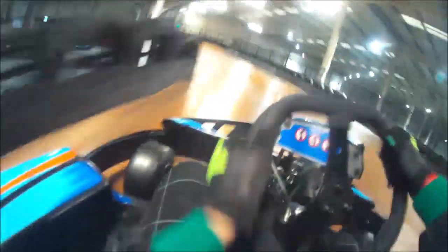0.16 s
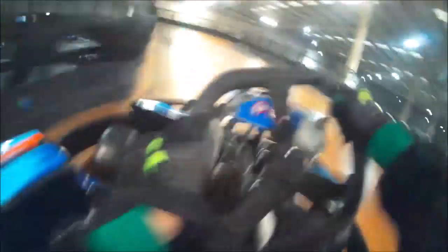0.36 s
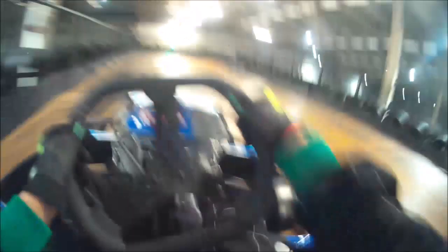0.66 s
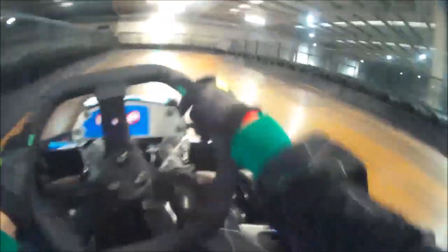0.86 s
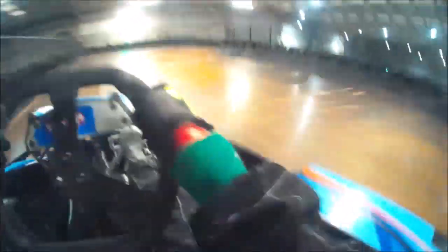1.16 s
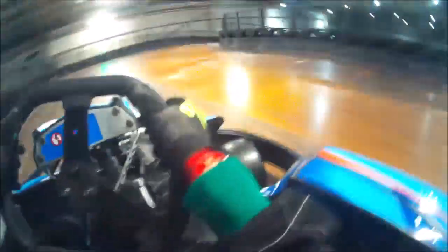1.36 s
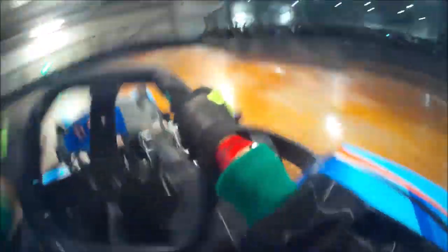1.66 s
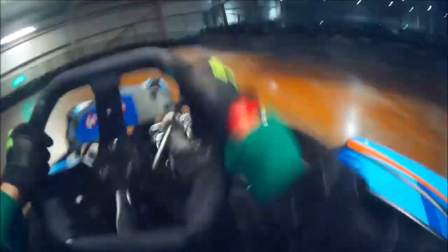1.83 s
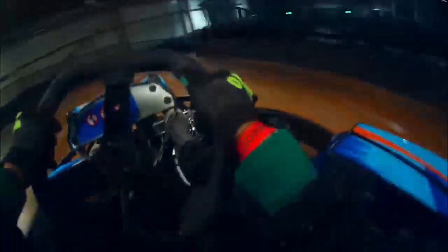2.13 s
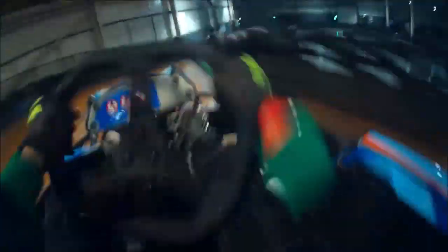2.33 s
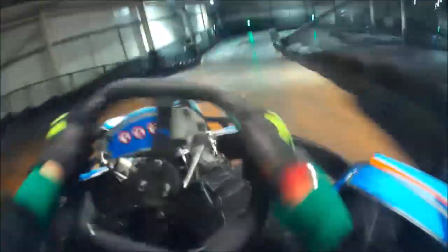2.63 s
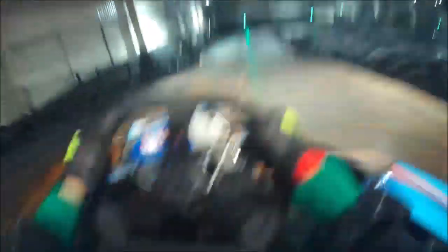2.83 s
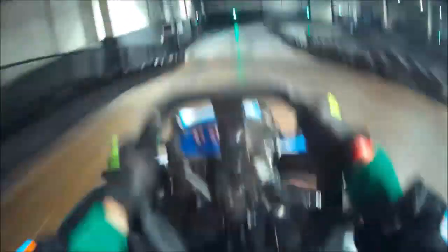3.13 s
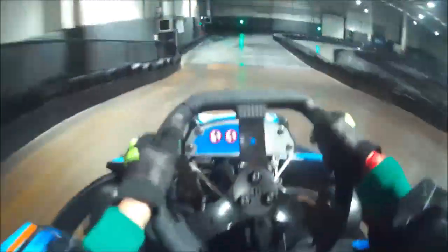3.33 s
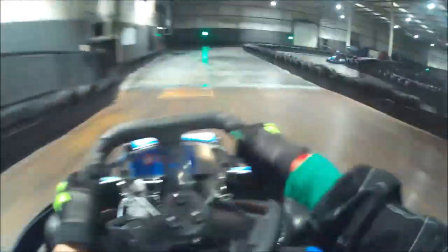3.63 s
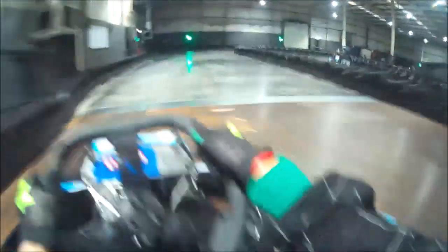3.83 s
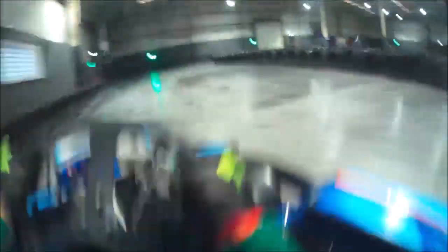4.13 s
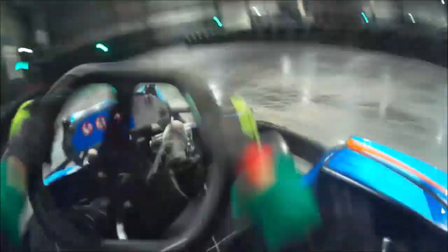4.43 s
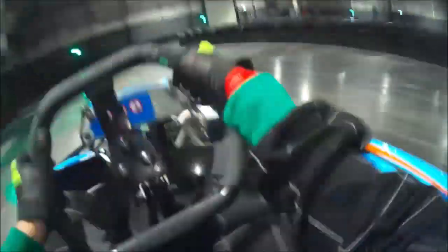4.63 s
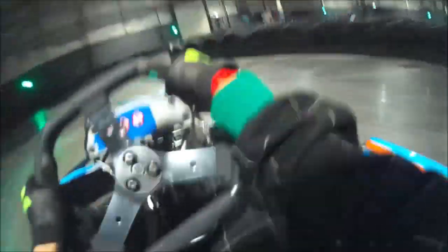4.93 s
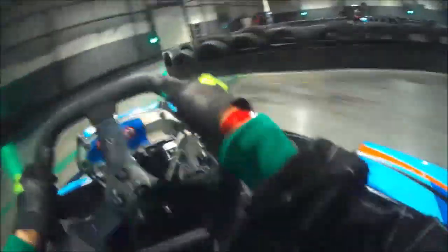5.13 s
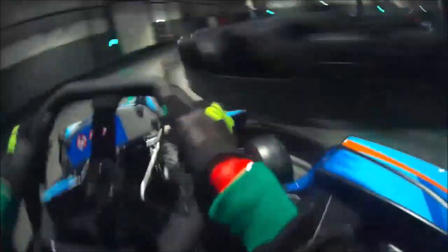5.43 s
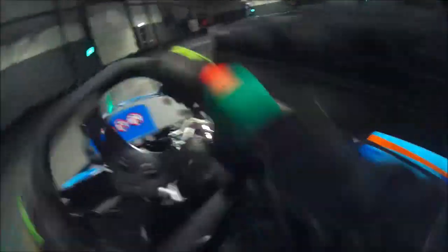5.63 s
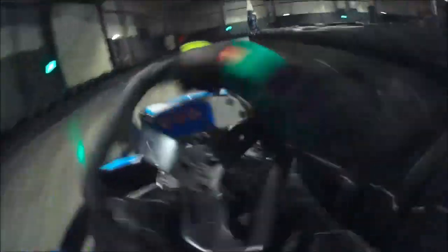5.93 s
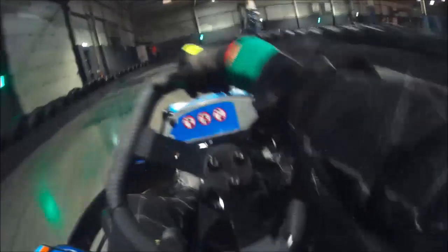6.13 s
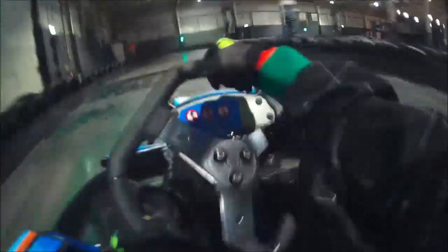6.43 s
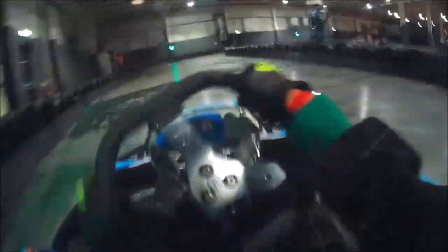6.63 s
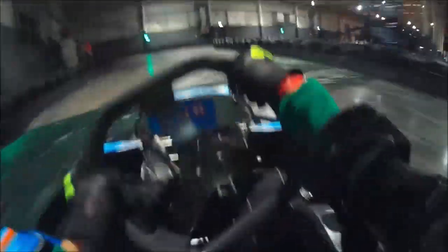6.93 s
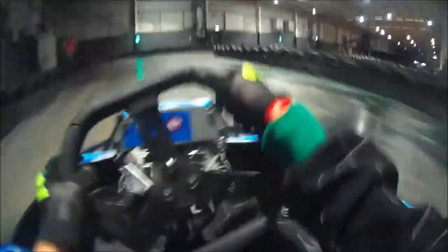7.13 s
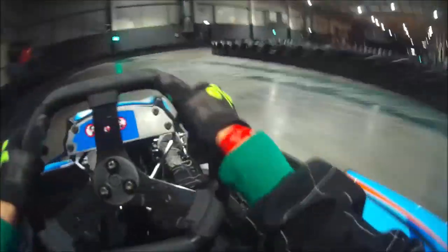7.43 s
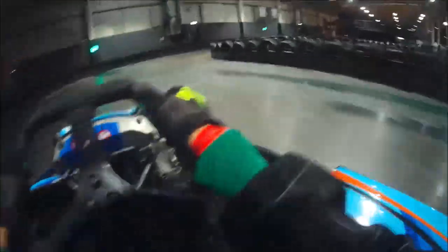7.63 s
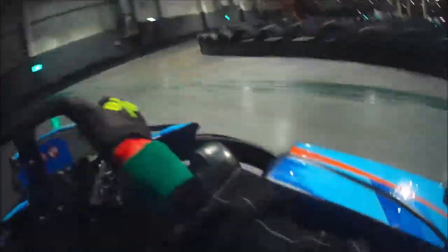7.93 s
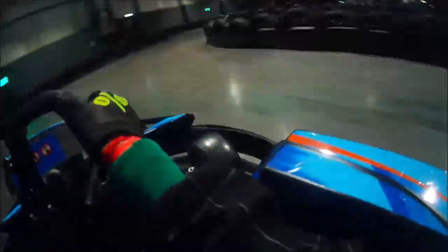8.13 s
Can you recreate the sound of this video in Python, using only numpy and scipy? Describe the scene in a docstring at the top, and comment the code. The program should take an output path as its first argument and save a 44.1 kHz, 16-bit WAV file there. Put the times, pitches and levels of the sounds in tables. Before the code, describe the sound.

Worn by the driver of an electric kart in a large indoor hall, the microphone picks up muffled rolling roar and hollow case drumming. Sliding tyres give thin, high chirps, then a bump knocks plastic parts sharply. After it come a few squeaks, a rapid cluster of rough lower screeches and a loud closing squeal. Motor whine and hum stay faint.

```python
"""Wheels roar and drum through a camera case worn by the driver of an electric go-kart on polished concrete in a
large hall. Sliding tyres chirp high and screech lower as they bite harder: tones with a pitch that load drags down.
Half-way the kart jolts over a bump and its plastic parts knock, as decaying case modes. Rolling and skidding are
coloured, fluttering noise; a faint drive whine and hum are sines. The tyre cries alone carry a diffuse hall tail."""
import sys
import numpy as np
from scipy import signal
from scipy.fft import rfft, irfft, next_fast_len
from scipy.io import wavfile
from scipy.ndimage import uniform_filter1d, minimum_filter1d

SR = 44100
rng = np.random.default_rng(int(sys.argv[2]) if len(sys.argv) > 2 else 0)


def write(x):
    x = np.atleast_2d(x).T
    wavfile.write(sys.argv[1], SR, np.round(np.clip(x, -1, 1) * 32767).astype(np.int16))

N = 364548
TIME = np.arange(N) / SR

# motor speed, as the pitch of its whine: (time [s], pitch [Hz])
SPEED = [(0, 919), (.8, 905), (1.15, 946), (1.45, 1034), (1.9, 1042), (3.2, 1131), (3.8, 1232), (4.8, 1150),
         (6, 1120), (7, 945), (7.3, 937), (7.68, 1033), (7.76, 922), (8.27, 852)]
CRUISE_HZ = 1000  # whine pitch at cruising speed
# rolling levels at cruising speed [dB]; scrub, sizzle and hiss do not grow with speed
ROAD_DB, CASE_DB, SHAKE_DB = -51, -46.5, -58
ROLL_SCRUB_DB, ROLL_SIZZLE_DB, ROLL_HISS_DB = -46.5, -55, -59
ROAR_DB_PER_OCTAVE = 12  # growth of road, case and shake with speed
# sideways slides; roar and drumming as at cruising speed:
# (start [s], attack [s], end [s], release [s], road roar [dB], drumming [dB], hiss [dB])
SKIDS = [(.08, .14, .79, .09, -50, -40.5, -47.5), (1.285, .05, 4.56, .25, -49, -38, -53),
         (5.15, .17, 5.335, .09, -47, -39, -51), (5.41, .12, 7.24, .15, -47, -37, -48),
         (7.9, .3, 8.3, .1, -58, -50, -50)]
# scrub in a full skid: (time [s], level [dB])
SCRUB_LEVEL = [(.4, -36.5), (1.4, -38), (3, -33.5), (4.5, -40.5), (5.8, -47), (6.9, -29.5), (7.3, -38),
               (8.27, -34)]
# sizzle in a full skid: (time [s], level [dB])
SIZZLE_LEVEL = [(.2, -40.5), (1.4, -43), (2.9, -35.5), (3.3, -41.5), (4, -47), (4.5, -40), (5.3, -46),
                (5.6, -41.5), (6.5, -46.5), (6.8, -36.5), (7.15, -49), (8.27, -45)]
# chassis shaking around the bump: moment, half-width and peak level
BUMP_S, BUMP_WIDTH_S, BUMP_SHAKE_DB = 4.27, .15, -49

# noise colours, relative levels: (frequency [Hz], density [dB per Hz])
ROAD = [(60, -29), (110, -5.5), (190, 0), (280, -3), (400, 2), (620, -1), (800, -1), (1050, -0.5),
        (1500, -33), (3000, -58)]
DRUMMING = [(800, -24), (1090, -10.5), (1230, 2.5), (1350, 0.5), (1450, 1.5), (1580, -3.5), (1800, -7.5),
            (2200, -11), (2550, -17.5), (3000, -14), (3600, -24), (5000, -23)]
TREAD = [(1300, -40), (1650, -9), (1900, -4.5), (2120, 3.5), (2350, -3), (2560, -9.5), (2950, -16.5),
         (3400, -20.5), (5000, -46)]
SIZZLE = [(2400, -10), (3000, -0.5), (3700, -4), (4300, 6), (4650, -3), (4900, -2.5), (5060, 2.5),
          (5350, -41), (7000, -21.5), (8300, -30), (9200, -18.5), (10000, -61)]
HISS = [(2500, -9), (4000, 2), (5600, 7), (6600, -3), (7600, -9.5), (9100, -9.5), (10000, -14.5),
        (11400, -13), (13000, -20), (16000, -22)]
RUMBLE = [(10, -2), (25, -3.5), (36, -6), (50, -9.5), (70, -12.5), (130, -25)]
# grit under a jolted wheel: (frequency [Hz], density [dB per Hz])
GRIT = [(2500, -6), (4000, -2), (6000, 5), (8800, -6), (10000, -8), (11500, -13), (13000, -22),
        (16000, -32)]

# hard slides: (start [s], length [s], lowest nominal pitch [Hz], level at deepest bite [dB], roughness [0-1])
SCREECHES = [(.459, 0.023, 2020, -22.5, .75), (.564, 0.058, 2070, -31.5, .7), (4.384, .047, 2043, -27, 0.3),
             (5.877, .018, 2060, -20.5, .3), (6.016, .03, 1967, -19.5, 0.6), (6.127, 0.015, 1927, -24, .85),
             (6.241, 0.054, 1990, -26.5, 0.81), (6.359, 0.04, 2015, -15.5, .42),
             (6.392, .027, 1792, -17.5, 0.54), (6.477, 0.044, 1931, -20.5, 0.5),
             (6.603, .017, 1744, -21, .85), (6.641, 0.023, 2004, -15.5, 0.07),
             (6.681, 0.061, 1720, -24.5, 0.61), (6.717, 0.073, 2000, -17.5, .35),
             (6.872, 0.036, 1792, -23, .55), (6.953, .068, 2030, -24.5, .3), (7.2, 0.042, 1250, -29, .06),
             (7.915, 0.015, 1840, -27.5, .4), (7.947, .027, 1780, -28, 0.2), (8.18, .065, 1210, -21, .3)]
SCREECH_BEND = .079  # share by which the pitch lies higher with no load
SCREECH_BITE = .44  # moment of the deepest bite, as a share of the length
# tyres in a full slide: (start [s], length [s], mean pitch [Hz], swing [Hz], wheel speed [turns per s],
# first low point [s], level half-way [dB], swell at the low point [dB])
SQUEALS = [(7.972, 0.33, 1780, 165, 9.5, 8.0, -17, 4), (7.97, 0.29, 2010, 185, 8.9, 8.024, -15.5, -1)]
SQUEAL_ATTACK_S, SQUEAL_GROWTH_DB_PER_S, SQUEAL_ROUGH = .0071, 18, .12
SQUEAL_LURCH, SQUEAL_LURCHES_PER_S = .028, 30  # rms share by which the pitch strays, and how often
# screech overtones as the case passes them: (frequency [Hz], level re fundamental [dB])
SCREECH_OVERTONES = [(3200, -29), (3700, -23), (4000, -32.5), (5000, -52), (5500, -24.5), (6100, -39),
                     (7000, -62), (9200, -50), (11000, -67)]

# light slides: (start [s], length [s], lowest nominal pitch [Hz], level before CHIRP_TRIM_DB [dB],
# moment of the deepest bite [share of length])
CHIRPS = [(.178, 0.081, 3950, -28, 0.77), (0.326, .026, 3980, -23.5, 0.57), (0.342, 0.093, 4450, -30, 0.2),
          (.49, .08, 4300, -36, .5), (1.299, 0.085, 3990, -33, .4), (1.388, 0.12, 4110, -31, .3),
          (1.508, .07, 4010, -33.5, .5), (1.524, .035, 2880, -34, 0.45), (1.644, .055, 3980, -28.5, 0.28),
          (1.814, 0.084, 4200, -33, 0.45), (1.942, 0.038, 4120, -30.5, .3), (2.003, 0.2, 4130, -30, 0.8),
          (2.379, .07, 3850, -33.5, 0.38), (2.498, .11, 4010, -28.5, .5), (2.656, .018, 3900, -27.5, 0.54),
          (2.675, .06, 3100, -28.5, .6), (2.715, .028, 3945, -26, 0.21), (2.814, .12, 3180, -33, 0.45),
          (2.827, 0.16, 4036, -29.5, .4), (4.206, 0.037, 3890, -26, 0.67), (4.392, 0.0346, 3380, -24, 0.61),
          (4.418, .07, 4070, -29, 0.25), (4.612, .028, 5110, -37.5, 0.76), (4.79, .1, 4350, -42, .5),
          (5.458, .032, 4500, -34, .25), (5.532, .055, 4470, -32.5, .25), (5.85, .035, 4750, -37, .7),
          (6.436, 0.052, 4460, -36.5, 0.35), (6.534, 0.086, 4100, -35, 0.82),
          (6.663, .066, 3890, -28, 0.58), (6.664, .05, 2990, -30.5, .5)]
CHIRP_TRIM_DB = -1.5
CHIRP_BEND = .11  # share by which the pitch lies higher with no load
# chirp overtones as the case passes them: (frequency [Hz], level re fundamental [dB])
CHIRP_OVERTONES = [(6000, -22), (7500, -16), (8400, -23.5), (9300, -19), (10000, -42), (11500, -23),
                   (13000, -62), (16000, -52)]

# plastic on plastic: (time [s], peak level [dB], hardness as upper band edge [Hz])
KNOCKS = [(4.027, -24, 1500), (4.0403, -7, 2200), (4.0421, -16.5, 1600), (4.0715, -7.5, 3000),
          (4.129, -14, 2000), (4.145, -18, 2000), (4.192, -17, 2500), (4.232, -0.5, 7160),
          (4.2547, -2.5, 7200), (4.279, -12, 5020), (4.3545, -19, 10000), (4.52, -16, 2700)]
# modes of the camera case: (frequency [Hz], width [Hz], mean strength per Hz of width [dB])
CASE = [(1260, 190, 1), (1510, 130, -19), (1720, 410, 6), (2080, 230, 5.5), (2840, 150, 8.5),
        (4430, 1200, 1.5), (5600, 1700, -7), (8600, 1800, -28), (11300, 1500, -27)]
# loose parts rattle after the bump, spread 3 dB either side of the level
RATTLE_FROM_S, RATTLE_TO_S, RATTLE_DB, RATTLE_HZ = 4.04, 4.2, -20, 2000

# mean motor hum: (time [s], level [dB])
HUM = [(0, -76), (2.35, -58), (3.2, -77), (5, -56.5), (5.6, -64), (6.9, -56.5), (7.3, -70)]
WHINE_DB, WHINE_DB_PER_OCTAVE = -54, 15  # level at steady cruising speed, growth with speed
THROTTLE_DB = 2.2  # at most this much louder under power, and softer when coasting
CUTOFF_HZ = 15500


def wheels():
    """Rolling roars and drums on the case, louder with speed; skidding rubber adds scrub, sizzle and hiss."""
    sliding, skid_roar, skid_drumming, skid_hiss = skids()
    pace = from_db(ROAR_DB_PER_OCTAVE * speed_octaves())
    scrub_db, sizzle_db = in_time(SCRUB_LEVEL)[0], in_time(SIZZLE_LEVEL)[0]
    # hypot adds the powers of rolling and skidding
    road_level = pace * np.hypot(from_db(ROAD_DB), skid_roar)
    case_level = pace * np.hypot(from_db(CASE_DB), skid_drumming)
    scrub_level = np.hypot(from_db(ROLL_SCRUB_DB), sliding * from_db(scrub_db))
    sizzle_level = np.hypot(from_db(ROLL_SIZZLE_DB), sliding * from_db(sizzle_db))
    hiss_level = np.hypot(from_db(ROLL_HISS_DB), skid_hiss)
    bump = from_db(BUMP_SHAKE_DB) / (1 + ((TIME - BUMP_S) / BUMP_WIDTH_S) ** 2)
    shake_level = np.hypot(pace * from_db(SHAKE_DB), bump)

    road = road_level * noise(ROAD, flutter_db=1.3, flutter_rate=46)
    case = case_level * noise(DRUMMING, flutter_db=1.5, flutter_rate=30)
    scrub = scrub_level * noise(TREAD, flutter_db=2.0, flutter_rate=26)
    sizzle = sizzle_level * noise(SIZZLE, flutter_db=2.5, flutter_rate=33)
    hiss = hiss_level * noise(HISS, flutter_db=3.5, flutter_rate=18)
    shake = shake_level * noise(RUMBLE, flutter_db=2.5, flutter_rate=5.6)
    return road + case + scrub + sizzle + hiss + shake


def skids():
    """Each skid sets in, holds and lets go: slide (0-1), then the gains of roar, drumming and hiss."""
    start, attack, end, release, *levels_db = np.transpose(SKIDS)[:, :, None]
    rise = (TIME - start) / attack
    fall = 1 - (TIME - end) / release
    gates = np.clip(np.minimum(rise, fall), 0, 1)
    return [gates.sum(axis=0)] + [np.sum(from_db(db) * gates, axis=0) for db in levels_db]


def screeches():
    """Loaded tyres shudder low: hoarse while they skip, nearly pure in a full slide, swinging with the wheel."""
    wander, grip_db, out = 0.12 * drift(320), 5.9 * drift(143), np.zeros(N)

    def shudder(i, hz, rough):
        """Roughness shakes both pitch and grip."""
        shaken_hz = hz * (1 + rough * wander[i])
        grip = from_db(np.sqrt(abs(rough)) * grip_db[i])
        return stick_slip(shaken_hz, grip, SCREECH_OVERTONES)

    for start, length, low_hz, db, rough in SCREECHES:
        i = samples(start, length)
        pressed = load(i, SCREECH_BITE)
        hz = low_hz * (1 + SCREECH_BEND * (1 - pressed))
        add(out, start, from_db(db) * pressed ** .42 * shudder(i, hz, rough))
    for start, length, hz, swing_hz, turns_per_s, low_s, db, swell_db in SQUEALS:
        i = samples(start, length)
        age = TIME[i] - start
        turn = np.cos(2 * np.pi * turns_per_s * (TIME[i] - low_s))
        growth_db = SQUEAL_GROWTH_DB_PER_S * (age - length / 2)
        attack = np.minimum(age / SQUEAL_ATTACK_S, 1)
        level = from_db(db + swell_db * turn + growth_db) * attack
        lurch = 1 + SQUEAL_LURCH * drift(SQUEAL_LURCHES_PER_S)[i]
        add(out, start, level * shudder(i, (hz - swing_hz * turn) * lurch, SQUEAL_ROUGH))
    # torn rubber rasps along with the tone
    drumming = from_db(-20) * noise(DRUMMING, flutter_db=3.5, flutter_rate=70)
    hiss = from_db(-35) * noise(HISS, flutter_db=3.0, flutter_rate=90)
    return out + force_of(out) * (drumming + hiss)


def chirps():
    """Light tread edges squeak high; load drags the pitch down, and lower squeaks slip more raggedly."""
    wander, grip, out = .026 * drift(276), from_db(4.65 * drift(136)), np.zeros(N)
    for start, length, low_hz, db, bite in CHIRPS:
        i = samples(start, length)
        pressed = load(i, bite)
        ragged = (4400 / low_hz) ** 1.55
        hz = low_hz * (1 + CHIRP_BEND * (1 - pressed)) * (1 + ragged * wander[i])
        level = from_db(db + CHIRP_TRIM_DB) * pressed ** 0.37
        add(out, start, level * stick_slip(hz, grip[i], CHIRP_OVERTONES))
    sizzle = from_db(-15.5) * noise(SIZZLE, flutter_db=4.0, flutter_rate=180)
    hiss = from_db(-19.5) * noise(HISS, flutter_db=5.0, flutter_rate=89)
    return out + force_of(out) * (sizzle + hiss)


def stick_slip(hz, flutter, overtones):
    """Tread sticks and slips at a given pitch; overtones come and go with the firmness of the grip."""
    phase = 2 * np.pi * np.cumsum(hz) / SR
    orders = np.arange(2, 6)[:, None]
    heights = from_db(np.interp(orders * hz, *np.transpose(overtones), right=-99))
    upper = np.sum(heights * np.sin(orders * phase), axis=0)
    tone = np.sin(phase) + rms_one(np.sqrt(flutter)) * upper
    return np.sqrt(2) * tone * rms_one(flutter)


def load(i, bite):
    """The load on the tread rises from 0 to 1 at the deepest bite and falls again."""
    age = np.linspace(0, 1, len(i))
    ramp = np.interp(age, [0, np.clip(bite, .05, .95), 1], [0, 1, 0])
    return np.sin(np.pi / 2 * ramp)


def force_of(x):
    """The force behind a tone, as its short-term rms."""
    return np.sqrt(np.abs(uniform_filter1d(x ** 2, size=400)))


def knocks():
    """Short contacts ring the case, harder ones up to its higher modes; loose parts buzz and grit crunches."""
    out, jolt, t = np.zeros(N), np.zeros(N), np.arange(SR // 10) / SR
    hz, width, mode_db = np.transpose(CASE)[:, :, None]
    for s, db, hard_hz in KNOCKS + rattle(count=8):
        # each contact excites the modes a little differently
        strength = from_db(mode_db + 2.0 * rng.standard_normal(hz.shape)) * width
        modes = np.sin(2 * np.pi * (hz * t + rng.random(hz.shape)))
        ring = np.sum(strength * np.exp(-np.pi * width * t) * modes, axis=0)
        band = signal.butter(2, [400, min(hard_hz, SR / 4)], "band", fs=SR, output="sos")
        ring = signal.sosfilt(band, ring)
        add(out, s, from_db(db) * ring / np.abs(ring).max())
        # soft, heavy contacts shake the most
        softness = 1 / (1 + (hard_hz / 3000) ** 2)
        add(jolt, s, from_db(db) * softness * np.exp(-t / 0.02))
    buzz = from_db(-10.0) * noise(DRUMMING, flutter_db=1.5, flutter_rate=120)
    thud = from_db(-21) * noise(ROAD, flutter_db=0.0, flutter_rate=120)
    crunch = from_db(-24.5) * noise(GRIT, flutter_db=3.0, flutter_rate=200)
    return out + jolt * (buzz + thud + crunch)


def rattle(count):
    """Loose parts touch at uneven moments after the bump; rows as in KNOCKS."""
    when, size = rng.random((count, 2)).T
    times = RATTLE_FROM_S + (RATTLE_TO_S - RATTLE_FROM_S) * (np.arange(count) + when) / count
    return [(s, db, RATTLE_HZ) for s, db in zip(times, RATTLE_DB + 6 * (size - .5))]


def drive():
    """Two close gear tones and a flickering overtone follow the motor's speed over a hum near 114 Hz."""
    hz, = in_time(SPEED)
    phases = [2 * np.pi * np.cumsum(ratio * hz * (1 + 0.00498 * drift(52))) / SR for ratio in (1, 1.065)]
    whine = sum(np.sin(phase) * from_db(2.6 * drift(7.9)) for phase in phases)
    overtone = from_db(-7 + 3 * drift(10)) * np.sin(3 * phases[0])
    hum_phase = 2 * np.pi * np.cumsum(114 * (1 + 0.0234 * drift(9.8))) / SR
    hum = np.sin(hum_phase) * from_db(3 * drift(9))
    octaves = speed_octaves()
    # acceleration in octaves per second, squeezed to -1 (coasting) to 1 (power)
    acceleration = uniform_filter1d(np.gradient(octaves) * SR, size=8000)
    throttle = np.tanh(acceleration / .06)
    whine_level = from_db(WHINE_DB + WHINE_DB_PER_OCTAVE * octaves + THROTTLE_DB * throttle)
    return whine_level * (whine + overtone) + from_db(in_time(HUM)[0]) * hum


def speed_octaves():
    """Speed above cruising, in octaves."""
    return np.log2(in_time(SPEED)[0] / CRUISE_HZ)


def hollow(x, hz, q):
    """An antiresonance of the case."""
    return signal.lfilter(*signal.iirnotch(hz, q, fs=SR), x)


def hall(x, t60, wet_db):
    """Floor, barriers and roof return a diffuse tail."""
    t = np.arange(SR) / SR
    echoes = rng.standard_normal(SR) * from_db(-60 * t / t60)
    echoes = echoes / np.sqrt(np.sum(echoes ** 2))
    return x + from_db(wet_db) * signal.fftconvolve(x, echoes)[:N]


def microphone_hiss():
    """Faint, steady white noise of the microphone."""
    return from_db(-64.5) * rng.standard_normal(N)


def noise(spectrum, flutter_db, flutter_rate):
    """Friction noise of a given colour whose force flutters; rms 1."""
    size = next_fast_len(N)
    hz, db = np.transpose(spectrum)
    grid = np.arange(1, size // 2 + 2) * SR / size
    colour = from_db(np.interp(np.log(grid), np.log(hz), db, left=-90, right=-90))
    force = rng.standard_normal(N) * from_db(flutter_db * drift(flutter_rate))
    return rms_one(irfft(rfft(force, size) * colour, size)[:N])


def drift(rate):
    """Smooth chance of rms 1 that changes about rate times a second."""
    size = next_fast_len(N)
    hz = np.arange(size // 2 + 1) * SR / size
    smooth = rfft(rng.standard_normal(size)) / (1 + (hz / rate) ** 2)
    return rms_one(irfft(smooth, size)[:N])


def in_time(rows):
    """Each column of a curve at every sample."""
    s, *columns = np.transpose(rows)
    return [np.interp(TIME, s, c) for c in columns]


def samples(start, length):
    """The samples that an event covers."""
    return np.arange(round(start * SR), min(round((start + length) * SR), N))


def add(out, start, sound):
    """Mix a sound in from a given time."""
    i = round(start * SR)
    out[i:i + len(sound)] += sound[:max(N - i, 0)]


def from_db(db):
    """Decibels to gain."""
    return 10 ** (np.asarray(db) / 20)


def rms_one(x):
    """Scale to unit power."""
    return x / np.sqrt(np.mean(np.abs(x) ** 2) + 1e-20)


def scene():
    """The kart close to the microphone, its tyre cries echoed by the hall, over faint microphone hiss."""
    low = hall(hollow(screeches(), hz=2630, q=7.5), t60=0.39, wet_db=-8.5)
    high = hall(chirps(), t60=0.48, wet_db=-7)
    return (wheels() + low + high + knocks() + drive() + microphone_hiss())[None]


def record(dry):
    """A look-ahead limiter holds the peaks at full scale; then the top above CUTOFF_HZ is cut."""
    needed = 1 / np.maximum(np.abs(dry), 1)
    gain = uniform_filter1d(minimum_filter1d(needed, size=400), size=400)
    low_pass = signal.ellip(12, .1, 90, CUTOFF_HZ, fs=SR, output="sos")
    return signal.sosfilt(low_pass, gain * dry)


dry = scene()
out = record(dry)
write(out)
```